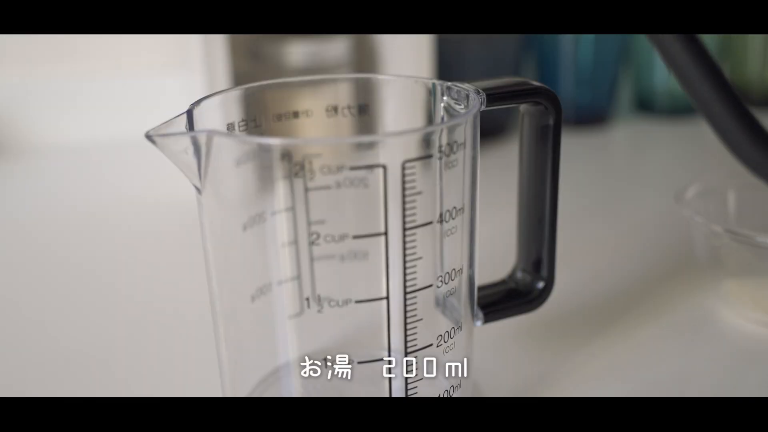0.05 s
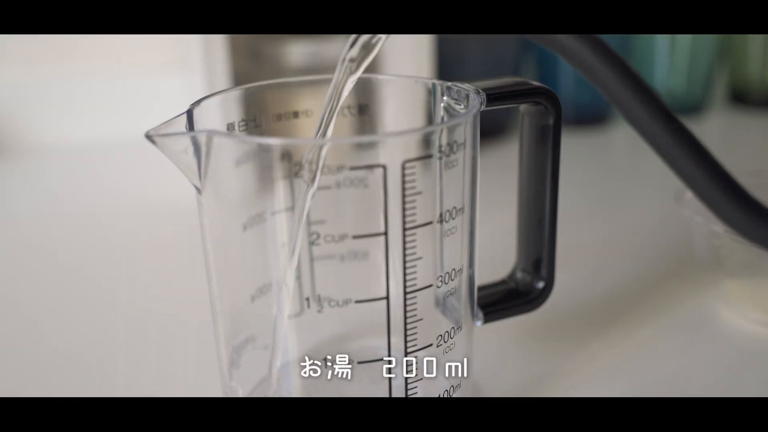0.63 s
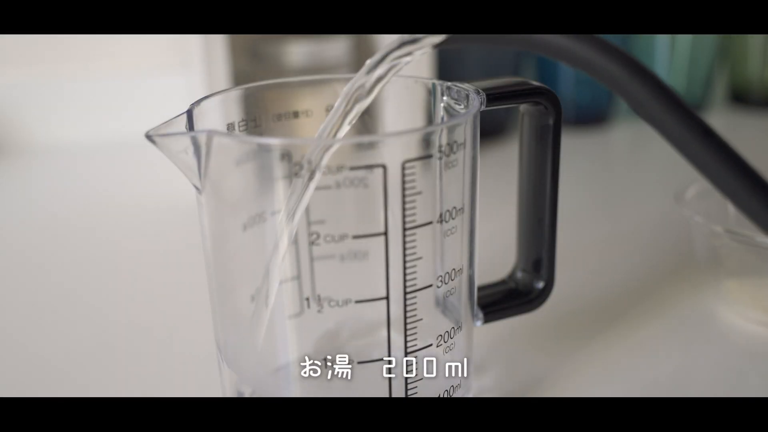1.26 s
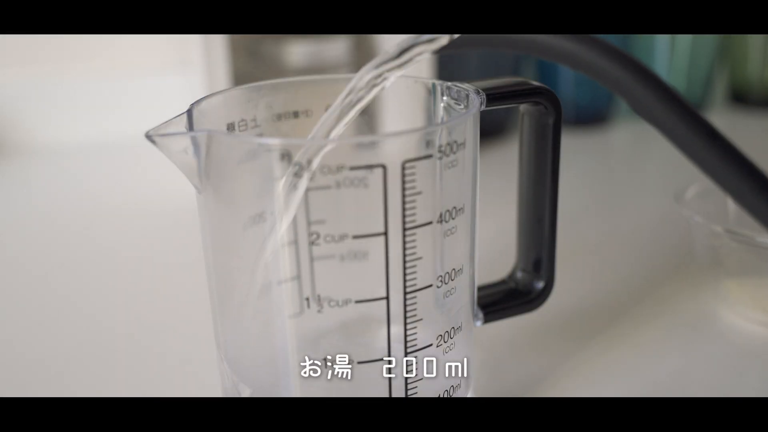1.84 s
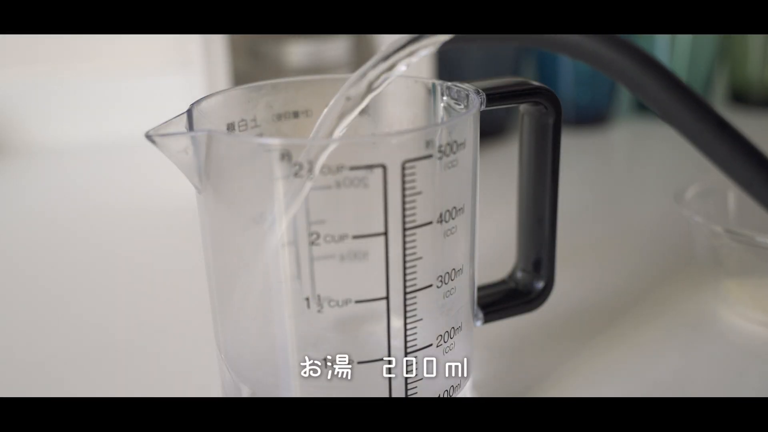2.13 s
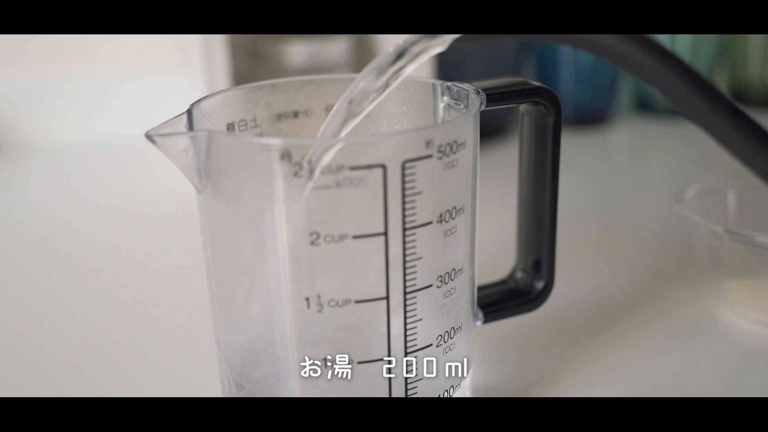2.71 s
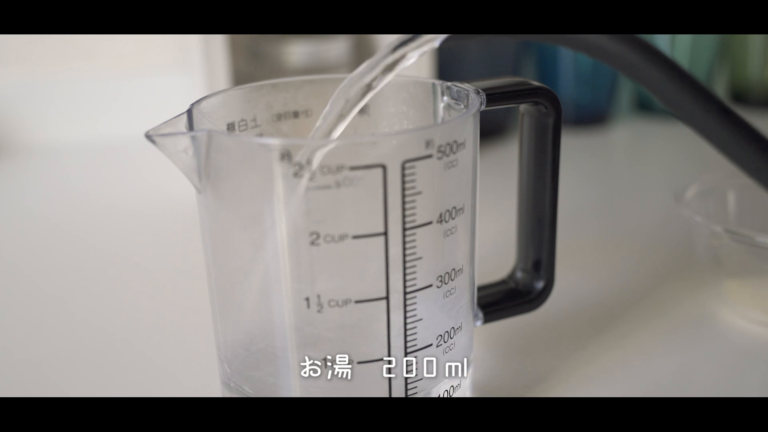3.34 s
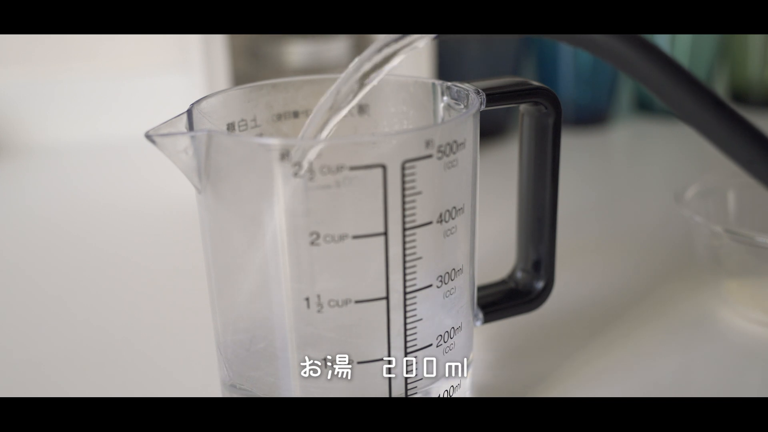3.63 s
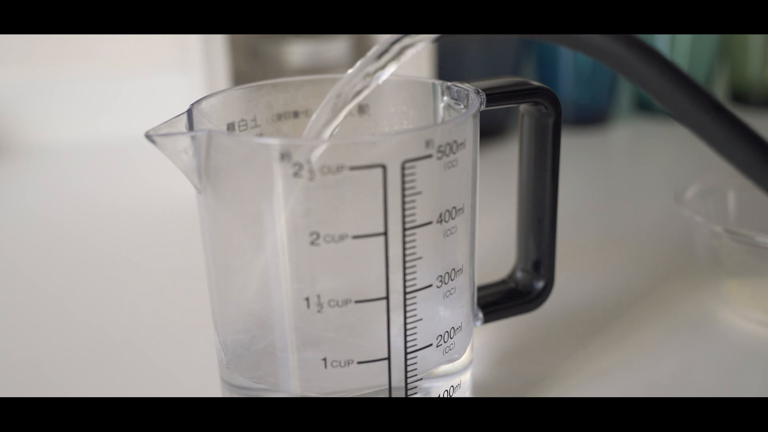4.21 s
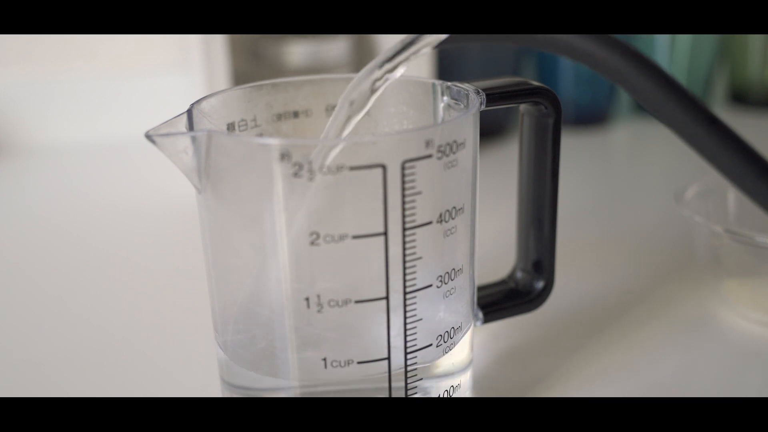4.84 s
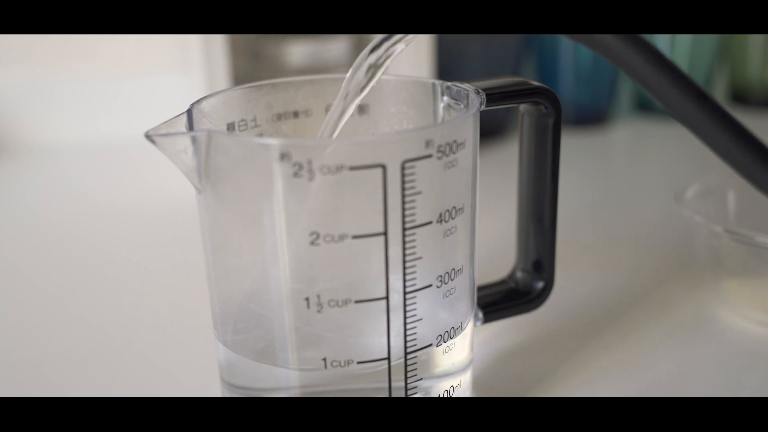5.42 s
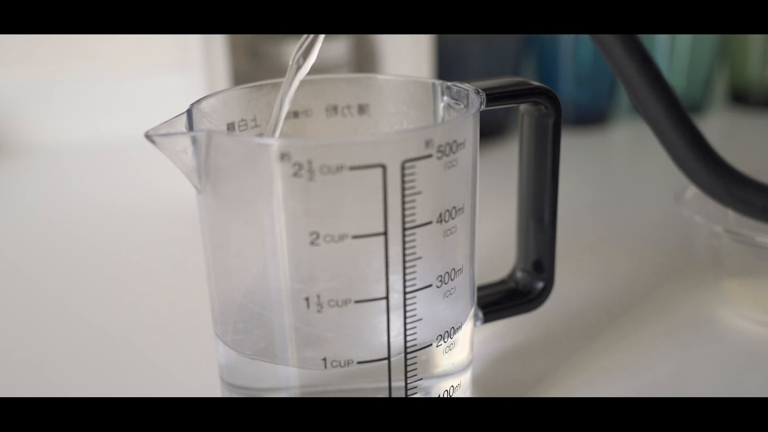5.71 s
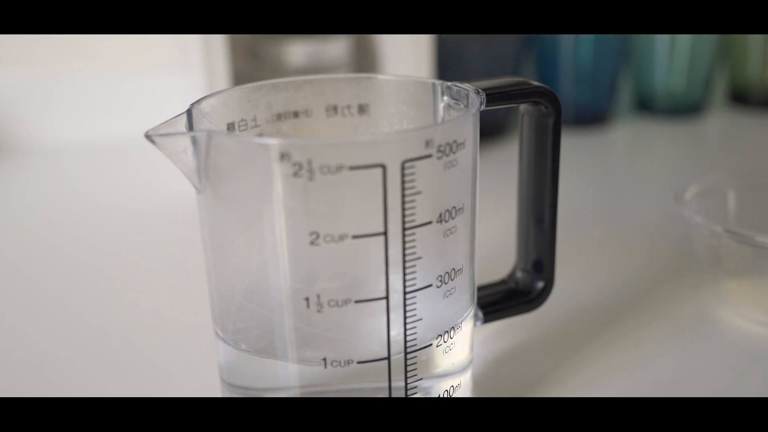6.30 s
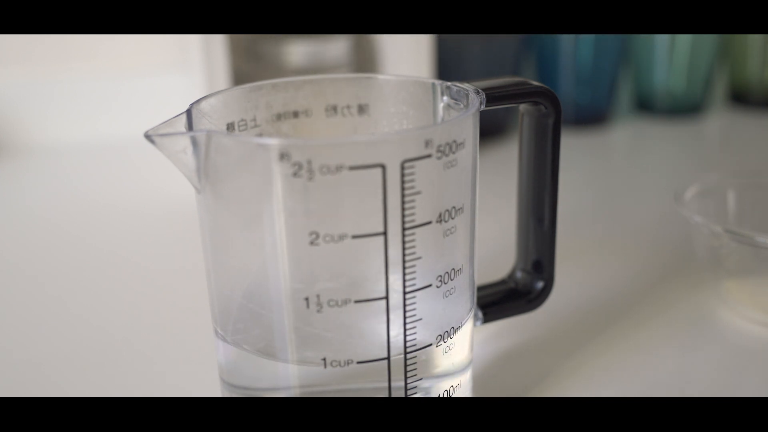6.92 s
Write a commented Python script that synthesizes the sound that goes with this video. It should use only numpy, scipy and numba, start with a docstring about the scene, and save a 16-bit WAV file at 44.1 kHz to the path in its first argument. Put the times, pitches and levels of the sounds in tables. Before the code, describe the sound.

Close water poured into a plastic cup: a short splashy burst, a quiet trickle with plops, then heavy final drops over a low hum.

```python
"""Over a low room hum, two heavy drops knock on the empty bottom of a plastic measuring cup, close by on a
kitchen counter. Hot water follows from a gooseneck kettle: it spatters and sizzles, slides in quietly
with a few plops, then breaks into heavy drops. Impacts drive the cup and counter, trapped bubbles ring,
and the air column rises in pitch as the water shortens it. At the end a sleeve brushes past."""
import sys
import numpy as np
from scipy import signal
from scipy.fft import rfft, irfft, next_fast_len
from scipy.io import wavfile
from scipy.ndimage import uniform_filter1d
from numba import njit

SR = 44100
rng = np.random.default_rng(int(sys.argv[2]) if len(sys.argv) > 2 else 0)


def unload_audio(sound):
    """Save the sound as a 16-bit wav file, at the path given as the first command line argument."""
    columns = np.transpose(np.atleast_2d(sound))
    # keep every value between -1 and 1, then stretch to whole-number steps
    steps = np.round(np.clip(columns, -1, 1) * 32767)
    wavfile.write(sys.argv[1], SR, steps.astype(np.int16))


N = 311346
T = np.arange(N) / SR

# Splash of the jet, strongest on the barely covered bottom. Each row: time in seconds, level in dB.
SPLASH_LEVELS = [(.38, -80), (.5, -60.5), (1.05, -57), (1.2, -54), (1.45, -56), (1.62, -47), (1.8, -28.5),
                 (1.97, -26), (2.1, -33.5), (2.26, -26), (2.4, -35.5), (2.49, -44), (2.9, -58.5),
                 (3.12, -53), (3.35, -62), (5.6, -67), (6.5, -66)]
# Drops that knock the cup. Each row: start in seconds, thud in dB, thump of the bottom in dB,
# bubble frequency in Hz, bubble level in dB, bubble Q, spray tick in dB. All levels are relative.
HEAVY_DROPS = [(.387, 11.5, 32.5, 4060, 7, 4.1, -3.5), (0.4098, 13, 25, 6000, -3.5, 0.8, -7),
               (4.454, 19, 18, 2000, 9.5, 1.16, -4.5), (4.577, 18, 13, 4000, 14.5, 3.1, -1.5),
               (4.9423, 10, 22, 3040, 10, 1.9, -17), (5.2055, 5, 8, 4485, 10.5, 0.76, -10),
               (5.8392, 15.5, 30, 3040, 18.5, 1.15, 9.5), (5.8699, 24, 20, 3370, 20.5, 1.8, 1.5),
               (5.8891, 19, 19, 4130, 2, 0.99, -5), (5.944, 34.5, 36, 3250, 18, 1.2, 5.5),
               (5.992, 14, 36, 9100, 15, 2.1, 7), (6.0588, 24, 26, 1760, 28.5, 2.8, -1)]
# Drops that slap the water. Each row: start in seconds, relative slap level in dB,
# bubble frequency in Hz, relative bubble level in dB, bubble Q.
LIGHT_DROPS = [(1.0798, -11, 1770, -3.5, 2.2), (1.1539, 7, 1920, -4, 1), (1.202, -12, 455, 9.5, 1.7),
               (1.2656, -2, 6000, 16, 1.05), (1.3626, -30, 4200, 11, 1.37), (1.3013, -21, 2270, -2.5, 0.77),
               (1.386, -2.5, 2310, 10, 4.3), (1.4962, 6, 3540, 18.5, 5.6), (1.523, 16, 3680, 19, 2.2),
               (1.5747, -1, 5900, 3, 0.55), (1.6422, 5, 2220, 17, 0.94), (1.7086, 21, 2370, 20, 1.5),
               (1.774, -18, 3610, 17, 4.7), (1.7909, 25, 5750, 5, 2), (1.8121, 16, 3850, 12, .7),
               (1.8374, 19, 3840, 18.5, 3.2), (1.8707, 20, 2000, 21.5, 2.7), (1.8941, -3, 3720, 20.5, 4),
               (2.256, 11.5, 3240, 12.5, 0.61), (2.3015, 10, 2670, 10, 1.2), (2.468, 2, 1170, 1.5, 1.1),
               (2.5733, 4, 2850, 8.5, 0.92), (3.0546, 6, 2550, -0.5, 0.69), (3.0903, 4, 2570, 7, 1.07),
               (3.9415, 0, 2800, 9.5, 1.06), (3.9505, -16, 3080, 8, 3.1), (4.1975, 0, 3800, 12.5, 1.43),
               (4.4313, -4.5, 3490, 14, 2.2), (4.5898, 10, 4200, 20.5, 1.25), (4.7684, -18, 3970, 3, 0.53),
               (5.199, 8, 3320, 10, 4.1), (5.688, 8.5, 3180, 9, 6.4), (5.6995, 6, 2430, 9.5, 0.94),
               (5.7123, 9.5, 4200, 6, 0.73), (5.721, 8.5, 1230, 7, 2.2), (5.7998, 1, 2760, 10, 1.2),
               (5.8964, 2, 3900, 9.5, 2), (5.9306, 18, 3400, 18.5, 2.5), (6.0853, -10, 3800, 10.5, 2.1)]
# Bubbles that burst. Each row: start in seconds, tick in dB, ring frequency in Hz, ring in dB.
SURFACE_BURSTS = [(0.4303, 9, 5560, 15.5), (0.5972, -13, 8700, -26), (1.3127, -8.5, 4020, 5),
                  (1.4486, -6, 3700, -13), (1.4851, 2.5, 5030, 5.5), (1.542, 2.5, 5430, 10),
                  (1.5586, -3, 5640, 5), (1.9566, 4, 3100, 13), (2.2618, 3, 4840, 8), (2.302, 6, 3000, 2),
                  (2.3624, 2.5, 3280, 8.5), (2.417, .5, 4000, -16), (2.4519, 2, 1950, 3),
                  (2.5527, 7.5, 5870, 7), (2.6087, -14, 4280, 2), (2.8081, -1, 4280, 8),
                  (2.8845, 3, 4500, 5.5), (2.914, -8, 4220, -5), (3.1944, -32, 4870, -2.5),
                  (3.4604, -14, 3800, -13.5), (4.0528, -10.5, 3600, -9), (4.2465, -5.5, 4030, -2.5),
                  (4.7182, -16.5, 3970, -0.5), (4.801, -11, 4040, 2), (5.4725, -8, 3530, 5.5),
                  (5.8177, -1, 3950, 12), (5.861, -1, 5000, 5), (5.949, 8, 4940, 12), (5.973, 3, 4470, 9.5),
                  (6.257, -5.5, 3920, -5), (6.316, -16, 4800, -3.5), (6.4023, -13, 5100, -5),
                  (6.649, 0.5, 7140, -11)]
# Modes of the air in the cup. Each row: multiple of its pitch, bandwidth in Hz, relative gain in dB.
AIR_COLUMN_MODES = [(0.999, 63.5, 13), (2.92, 113, 2)]
# Foam weakens those modes until the jet slows and the surface clears.
# Each row: time in seconds, relative gain in dB.
AIR_COLUMN_GAINS = [(1.74, 7), (2.3, -3), (4, -10), (4.45, -3.5)]
# Modes of the plastic cup. Each row: frequency in Hz, bandwidth in Hz, relative gain in dB.
CUP_MODES = [(1045, 20, -16), (1188, 95, -2), (1750, 450, 0), (2883.5, 11, 10.5), (3397, 155, 4),
             (3690, 140, 0), (3820, 99, -1), (4167, 97, 1.5), (4060, 67, 7), (4495, 94, 2), (5480, 110, 3),
             (5780, 96, -1.5), (6130, 190, -1), (7160, 840, 3.5), (8240, 650, -8.5)]
# Bands in which the wall's bending waves smear a click. Each row: centre in Hz, bandwidth in Hz.
WALL_DISPERSION = [(2300, 2500), (3700, 260), (4800, 1200), (7000, 1500), (11000, 520)]
# Modes of the counter. Each row: frequency in Hz, bandwidth in Hz, relative gain in dB.
COUNTER_MODES = [(63, 4.9, 14), (110, 65, 5), (160, 42, 10.5), (235, 35, 4), (309, 69, 10), (360, 45, -15),
                 (540, 31, -7)]
# Reflections by band. Each row: low edge in Hz, high edge in Hz, near level in dB,
# near T60 in seconds, room level in dB, room T60 in seconds.
REFLECTION_BANDS = [(39.8, 640, -4, 0.082, -6.5, 0.31), (515, 2720, -5, 0.024, -15.5, 0.15),
                    (2300, 5770, -8.5, 0.06, -16.5, 0.25), (6650, 21000, -10.5, 0.042, -20.5, 0.16)]
# Friction noise of the sleeve. Each row: frequency in Hz, relative spectral density in dB.
CLOTH_SPECTRUM = [(60, 6), (300, 2.5), (900, 3.5), (1400, -1), (2400, 1), (3000, 0.5), (4200, 4.5),
                  (6000, -7), (9000, -13), (16000, -24)]
# Ventilation rumble and hiss. Each row: frequency in Hz, relative spectral density in dB.
ROOM_SPECTRUM = [(20, -4.5), (40, -1), (60, 1), (80, 0.5), (105, 1), (135, -9.5), (175, -5), (270, -14.5),
                 (390, -10.5), (600, -21.5), (1500, -29.5), (4000, -34.5), (8000, -38.5), (16000, -38)]

POUR_START_S, POUR_END_S = .39, 6.1
DROP_TICK_DB = -20  # a drop's tick of spray, relative to its bubble


def stream(surge_db=2.0, full_splash_db=-26):
    """Impact and air entrainment: the jet gurgles, and shatters into spray on the shallow bottom."""
    splash_db = curve(SPLASH_LEVELS)
    gurgle_db = -34 + 0.77 * (splash_db - full_splash_db)  # grows more slowly than the splash
    spray_db = -28.5 + 1.01 * (splash_db - full_splash_db)
    surges = undb(surge_db * walk(110))  # the jet arrives in beads
    patter = surges * droplet_patter(per_s=520, spread_db=4, splash=.5, splash_s=.0005)
    large = bubble_cloud(400, 1500, cycles=2.5, spread_db=2.5, glide=.03, count=1200)
    small = bubble_cloud(1900, 5800, cycles=4, spread_db=3, glide=.01, count=2200)
    tiny = bubble_cloud(6000, 15000, cycles=3, spread_db=3.5, glide=.01, count=2500)
    drumming = unit(ring(patter, COUNTER_MODES))  # the bottom passes the patter on to the counter
    gurgle = 0.48 * unit(butter(patter, [620, 1300], "band")) + 0.32 * large + 0.58 * drumming
    splash = 0.63 * unit(butter(patter, [1900, 5200], "band")) + .5 * small
    flung = surges * droplet_patter(per_s=420, spread_db=4.3, splash=.35, splash_s=.0004)
    spray = 1.14 * unit(butter(flung, 9300, "high")) + 0.57 * tiny
    sloshing = slosh() * (undb(-67) * gurgle + undb(-68.5) * (splash + undb(-9.5) * spray))
    return undb(gurgle_db) * gurgle + undb(splash_db) * splash + undb(spray_db) * spray + sloshing


def droplet_patter(per_s, spread_db, splash, splash_s):
    """Shot noise: random blows, most small and a few large, each trailing a splash; rms 1."""
    sizes = undb(spread_db * np.minimum(rng.exponential(size=N), 4)) * rng.choice([-1, 1], N)
    blows = sizes * (rng.random(N) < per_s / SR)
    decay_samples = splash_s * SR
    energy = signal.lfilter([1 / decay_samples], [1, -np.exp(-1 / decay_samples)], blows ** 2 + 1e-18)
    return unit(blows + splash * np.sqrt(energy) * rng.standard_normal(N))


def bubble_cloud(lo_hz, hi_hz, cycles, spread_db, glide, count):
    """Bubble resonance: each pocket of air is a damped oscillator with a short rising ping; rms 1."""
    out = np.zeros(N)
    for when, pitch, chance in rng.random((count, 3)):
        hz = lo_hz * (hi_hz / lo_hz) ** pitch
        age = np.arange(int(5 * cycles * SR / hz)) * hz / SR  # in cycles
        ping = np.exp(-age / cycles) * np.sin(2 * np.pi * age * (1 + glide * age / cycles))
        add(out, when * N / SR, undb(-spread_db * np.log(max(chance, .02))) * ping)
    return unit(out)


def heavy_drops(mid_db=21.5, mid_cutoff_hz=1430, db_per_octave=30):
    """Contact time limits bandwidth: heavier drops land more softly, so their thud is duller."""
    thuds, pushes, plinks = np.zeros((3, N))
    for s, thud_db, thump_db, hz, bubble_db, q, tick_db in HEAVY_DROPS:
        cutoff_hz = mid_cutoff_hz * 2 ** ((mid_db - thud_db) / db_per_octave)
        blow = impact(splash=0.52, splash_s=0.014)
        add(thuds, s, undb(thud_db) * butter(blow, cutoff_hz, "low", order=4))
        add(pushes, s, undb([thump_db]))
        add(plinks, s, bubble_and_tick(hz, bubble_db, q, tick_db))
    flexing = resonate(pushes, hz=72.4, width_hz=100)  # the bottom bends and springs back
    thumps = undb(-2.5) * butter(flexing, 195, "low")
    direct = undb(-2.0) * butter(thuds, 214, "high", order=1)
    return direct + undb(-7) * ring(thuds, COUNTER_MODES) + thumps + plinks


def slosh(t60_s=0.47):
    """Damped agitation: each heavy drop stirs the water, and this envelope decays exponentially."""
    kicks = np.zeros(N)
    for s, thud_db, *_ in HEAVY_DROPS:
        add(kicks, s, undb([thud_db]))
    return signal.lfilter([1], [1, -np.exp(-np.log(1000) / (t60_s * SR))], kicks)


def light_drops(tick_db_per_octave=4.5):
    """Impact on water: a hollow slap traps a bubble and couples only weakly to the counter."""
    blows, plinks = np.zeros((2, N))
    for s, slap_db, hz, bubble_db, q in LIGHT_DROPS:
        add(blows, s, undb(slap_db) * impact(splash=1.0, splash_s=0.0025))
        # smaller, higher bubbles fling more spray
        tick_db = bubble_db + DROP_TICK_DB + tick_db_per_octave * np.log2(hz / 3500)
        add(plinks, s, bubble_and_tick(hz, bubble_db, q, tick_db))
    slaps = undb(-3.5) * butter(blows, [640, 1350], "band")
    return slaps + undb(-18.5) * ring(blows, COUNTER_MODES) + plinks


def impact(splash, splash_s, size=2048, rise_s=0.00096):
    """Impulsive excitation: a sharp blow, then a splash of noise that builds and decays; energy 1."""
    t = T[:size]
    noise = rng.standard_normal(size) * np.exp(-t / splash_s) * (1 - np.exp(-t / rise_s))
    push = splash * noise / np.linalg.norm(noise)
    push[0] = 1
    return push / np.linalg.norm(push)


def bubble_and_tick(hz, bubble_db, q, tick_db, rise_per_s=4):
    """Free oscillation: a struck bubble rings, rising as it nears the surface, with a tick of spray."""
    push = impact(splash=1.0, splash_s=0.0034)
    rising_hz = hz * (1 + rise_per_s * T[:len(push)])
    width_hz = hz / q
    bubble = resonate(resonate(push, rising_hz, width_hz), rising_hz, width_hz)
    tick = butter(impact(splash=1.0, splash_s=0.001, rise_s=0.00032), [6600, 14800], "band")
    return undb(bubble_db) * bubble + undb(tick_db) * tick


def bursts(cavity_q=1.74):
    """Film rupture: a bubble snaps with a bright tick and its opened cavity rings briefly."""
    out = np.zeros(N)
    for s, tick_db, hz, ring_db in SURFACE_BURSTS:
        add(out, s, bubble_and_tick(hz, ring_db, cavity_q, tick_db))
    return out


def spatter():
    """Splash ejection: drops fly at first contact, in shallow water and when the jet breaks up."""
    first = stray_drops(start_s=0.39, end_s=0.48, level_db=-10, lo_hz=4330, hi_hz=6650, count=12)
    shallow = stray_drops(start_s=1.05, end_s=3.3, level_db=-9, lo_hz=2020, hi_hz=5300, count=60)
    breakup = stray_drops(start_s=5.2, end_s=6.4, level_db=-8, lo_hz=2900, hi_hz=6000, count=26)
    return first + shallow + breakup


def stray_drops(start_s, end_s, level_db, lo_hz, hi_hz, count, spread_db=5, q=2.4):
    """Secondary impacts: thrown drops fall back at random, each ringing a small bubble."""
    out = np.zeros(N)
    for when, pitch, size in rng.random((count, 3)):
        s = start_s + when * (end_s - start_s)
        hz = lo_hz * (hi_hz / lo_hz) ** pitch
        db = level_db + spread_db * (2 * size - 1)
        add(out, s, bubble_and_tick(hz, db, q, db + DROP_TICK_DB))
    return out


def fizz(level_db=-66):
    """Small cavities ring high: once the bottom is wet, tiny bubbles burst now and then."""
    wet = T > POUR_START_S
    pings = bubble_cloud(4450, 17400, cycles=2.8, spread_db=12.0, glide=0.0079, count=70)
    return undb(level_db) * wet * pings


def cup(water):
    """Dispersion and resonance: the plastic wall smears each click; wall and air modes colour it."""
    for hz, width_hz in WALL_DISPERSION:
        water = water - 2 * resonate(water, hz, width_hz)  # all-pass: delays without colouring
    air_hz = air_pitch()
    air_modes = [(multiple * air_hz, width_hz, db) for multiple, width_hz, db in AIR_COLUMN_MODES]
    air = undb(curve(AIR_COLUMN_GAINS)) * ring(water, air_modes)
    return undb(-3.5) * water + undb(-4.5) * air + undb(-5.0) * ring(water, CUP_MODES)


def air_pitch(empty_hz=710, full_hz=965):
    """Quarter-wave resonance: pitch goes as one over the air's height, which shrinks steadily."""
    return 1 / np.interp(T, [POUR_START_S, POUR_END_S], [1 / empty_hz, 1 / full_hz])


def jet_note(level_db=-58.5, flutter_db=2, width_hz=150):
    """Noise-driven resonance: the smooth jet draws a soft, rising note from the air column."""
    air_hz = air_pitch()
    note = resonate(resonate(rng.standard_normal(N), air_hz, width_hz), air_hz, width_hz)
    tilt = swell(POUR_START_S, end_s=5.03, attack_s=0.3, release_s=1)  # the kettle tips, then is raised
    return unit(note) * tilt * undb(level_db + flutter_db * walk(11))


def kitchen(x, near_delay_s=0.0029, wall_delay_s=0.018):
    """Reverberation: quick reflections off cup and counter precede a faint tail from the room."""
    t = T[:SR // 2]
    response = np.zeros(len(t))
    for lo_hz, hi_hz, near_db, near_t60, room_db, room_t60 in REFLECTION_BANDS:
        for db, t60, delay_s in ((near_db, near_t60, near_delay_s), (room_db, room_t60, wall_delay_s)):
            tail = rng.standard_normal(len(t)) * np.exp(-np.log(1000) * t / t60) * (t > delay_s)
            response += undb(db) * butter(tail / np.linalg.norm(tail), [lo_hz, hi_hz], "band", order=3)
    return x + signal.fftconvolve(x, response)[:N]


def sleeve(level_db=-37, rough_db=2):
    """Friction noise: cloth brushes past in uneven slips as the kettle is drawn away."""
    stroke = swell(start_s=6.75, end_s=6.99, attack_s=0.026, release_s=0.17)
    return coloured(CLOTH_SPECTRUM) * stroke * undb(level_db + rough_db * walk(250))


def room_noise(noise_db=-39.5, hum_hz=60, hum_db=-48, waver_db=2.5):
    """Noise floor: broadband ventilation rumble and hiss, with a wavering appliance hum."""
    phase = 2 * np.pi * hum_hz * T + 0.67 * walk(6.6)
    hum = np.sqrt(2) * np.sin(phase) * undb(hum_db + waver_db * walk(6.0))
    return coloured(ROOM_SPECTRUM) * undb(noise_db) + hum


def ring(x, modes):
    """Modal superposition: the summed response of modes given as frequency, bandwidth and gain."""
    return sum(undb(db) * resonate(x, hz, width_hz) for hz, width_hz, db in modes)


def resonate(x, hz, width_hz):
    """Forced response of one resonance, fixed or moving."""
    return state_variable_bandpass(x, np.minimum(hz, .45 * SR) * np.ones(len(x)), float(width_hz))


@njit
def state_variable_bandpass(x, hz, width_hz):
    """Two integrators in a loop form a damped oscillator; gain 1 at its moving centre."""
    y, band_state, low_state = np.empty(len(x)), 0., 0.
    for i in range(len(x)):
        step, damping = np.tan(np.pi * hz[i] / SR), width_hz / hz[i]
        band = (band_state + step * (x[i] + 1e-18 - low_state)) / (1 + step * (step + damping))
        band_state = 2 * band - band_state
        low_state += 2 * step * band
        y[i] = damping * band
    return y


def butter(x, hz, kind, order=2):
    """Causal, maximally flat low-, high- or band-pass."""
    sections = signal.butter(order, np.minimum(hz, .45 * SR), kind, fs=SR, output="sos")
    return signal.sosfilt(sections, x + 1e-18)


def coloured(spectrum):
    """Spectral shaping of white noise; rms 1."""
    hz, db = np.transpose(spectrum)
    size = next_fast_len(N)
    bin_hz = np.maximum(np.fft.rfftfreq(size, 1 / SR), 1)
    gain = undb(np.interp(np.log(bin_hz), np.log(hz), db))
    return unit(irfft(rfft(rng.standard_normal(size)) * gain, size)[:N])


def walk(per_s):
    """Random modulation that glides to a new value per_s times a second; rms 1."""
    hold = int(SR / per_s)
    steps = np.repeat(rng.standard_normal(N // hold + 1), hold)[:N]
    return unit(uniform_filter1d(steps, hold))


def swell(start_s, end_s, attack_s, release_s):
    """Trapezoidal envelope: rises, holds at 1 and falls."""
    return np.clip(np.minimum((T - start_s) / attack_s, (end_s - T) / release_s), 0, 1)


def curve(rows):
    """Linear interpolation of a time table at every sample."""
    return np.interp(T, *np.transpose(rows))


def add(out, s, sound):
    """Superpose a sound from s seconds on."""
    i = int(np.clip(s * SR, 0, N - 1))
    out[i:i + len(sound)] += sound[:N - i]


def undb(db):
    """Decibels to amplitude ratio."""
    return 10 ** (np.asarray(db) / 20)


def unit(x):
    """Normalise to rms 1."""
    return x / np.sqrt(np.mean(x ** 2))


def scene():
    """Source and filter: water sounds through cup and kitchen; sleeve and room noise add to it."""
    water = heavy_drops() + light_drops() + bursts() + spatter() + stream() + fizz()
    pour = cup(water) + jet_note()
    return (kitchen(pour) + sleeve() + room_noise())[None]


def record(dry, cutoff_hz=15900):
    """Clipping and band limiting: peaks stop at full scale, then the highest treble is cut."""
    lowpass = signal.ellip(8, .1, 50, cutoff_hz, fs=SR, output="sos")
    return signal.sosfiltfilt(lowpass, np.clip(dry, -1, 1))


dry = scene()
out = record(dry)
unload_audio(out)
```